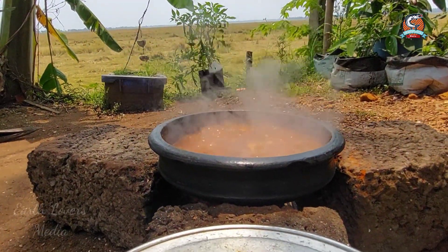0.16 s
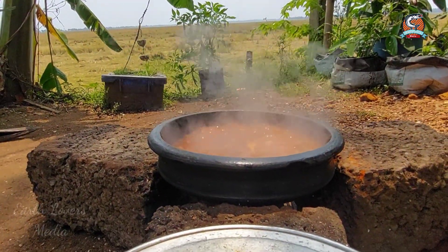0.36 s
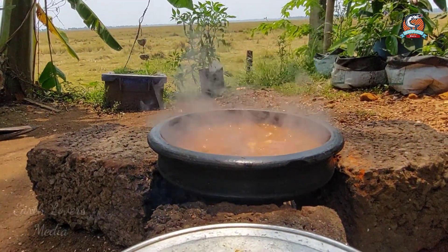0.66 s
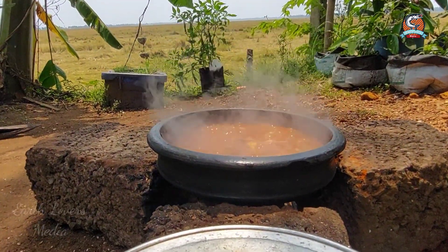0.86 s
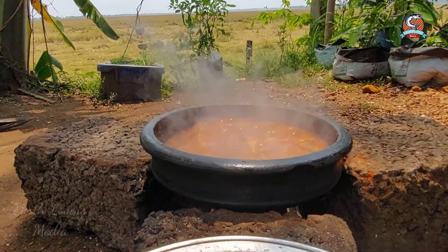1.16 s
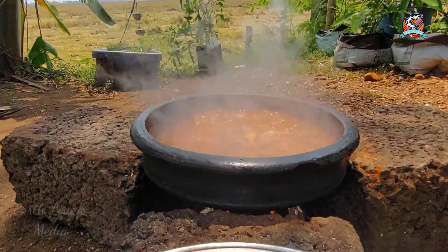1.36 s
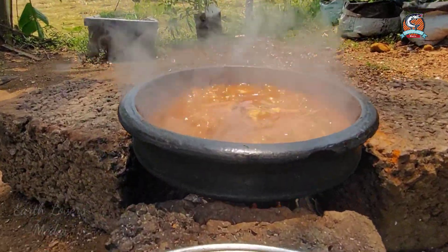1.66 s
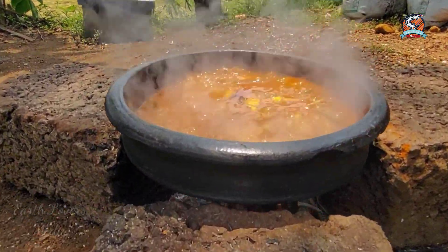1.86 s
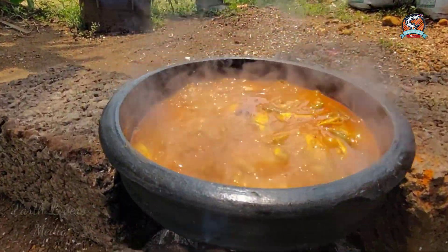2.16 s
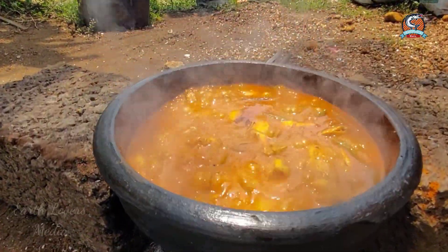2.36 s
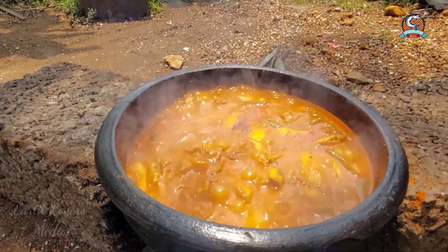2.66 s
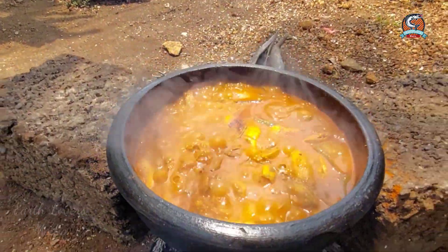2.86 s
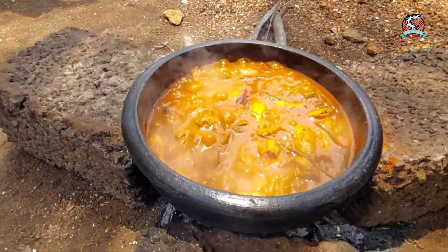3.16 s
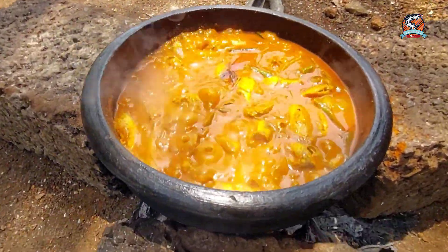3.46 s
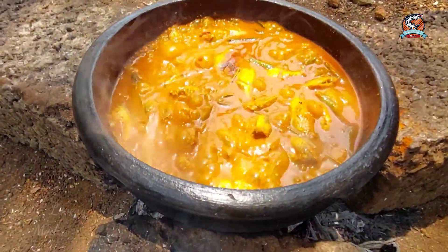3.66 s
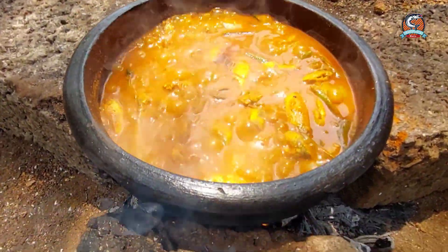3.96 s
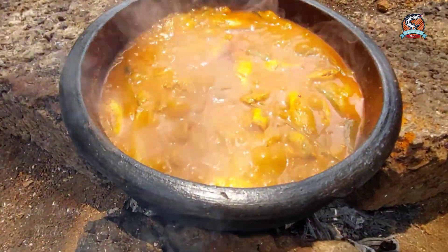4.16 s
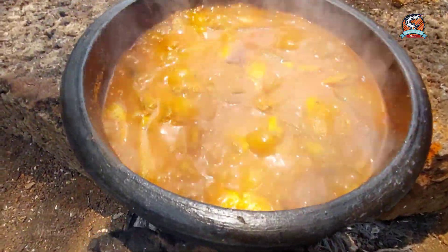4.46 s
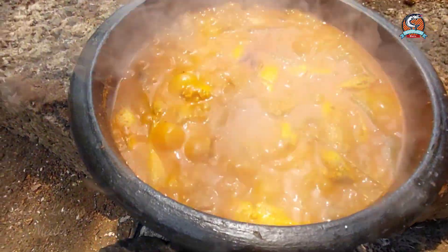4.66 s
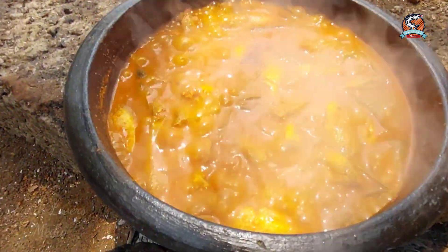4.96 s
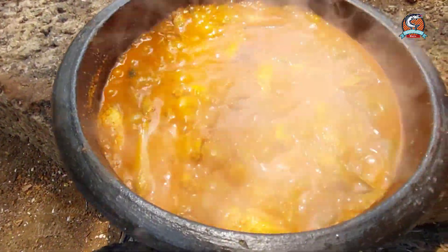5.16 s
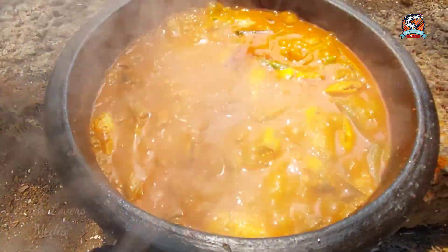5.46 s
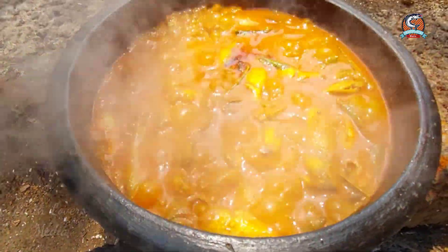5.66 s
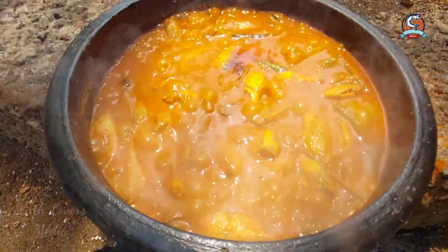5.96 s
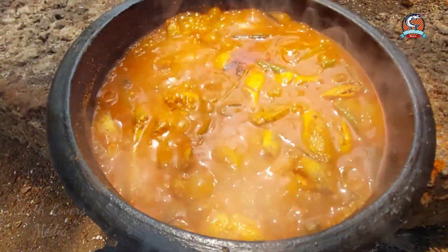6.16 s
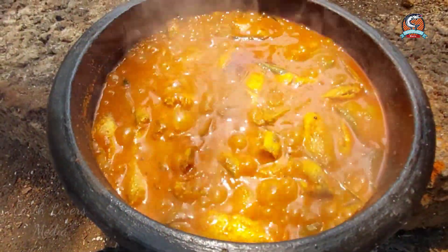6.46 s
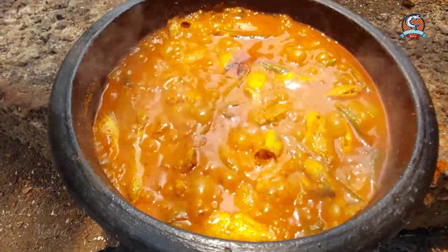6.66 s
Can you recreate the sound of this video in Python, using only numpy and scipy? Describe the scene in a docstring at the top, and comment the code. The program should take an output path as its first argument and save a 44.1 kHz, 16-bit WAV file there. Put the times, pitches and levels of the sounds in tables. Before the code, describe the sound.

A heavy sauce bubbles and spits over an open hearth, starting distant with faint bird notes, then swelling into close, sharp, gloopy popping.

```python
"""Thick curry boiling in a clay pot

The pot boils hard on an outdoor wood hearth while the microphone moves in from a step away to just over the rim.
Bubbles burst in clusters, each a short ring that climbs in pitch; shaped noise churns and fizzes beneath them.
Fine spatter adds brief high rings with spits of noise, and a low draught rumbles as wavering noise.
Puffs of air thump on the microphone as falling low tones, and a far bird calls faintly near the start.
"""
import sys
import numpy as np
from scipy import signal
from scipy.fft import rfft, irfft, next_fast_len
from scipy.io import wavfile
from scipy.ndimage import map_coordinates

SR = 44100
rng = np.random.default_rng(int(sys.argv[2]) if len(sys.argv) > 2 else 0)


def wav_out(sig):
    """Save sig, one row per channel (or a flat mono array), as 16-bit PCM at SR to the path in sys.argv[1]."""
    wavfile.write(sys.argv[1], SR, np.round(np.clip(np.atleast_2d(sig).T, -1, 1) * 32767).astype(np.int16))


N = 299880

# Noise colour of the fizz and of the spits of steam. Each row: frequency in Hz, relative level in dB.
FIZZ_COLOUR = [(1500, 0), (3200, 12.5), (5300, 4), (7500, 1.5), (11200, 3.5), (12200, -10), (15500, -20)]
# The treble that tiny bubbles and spatter radiate. Each row: frequency in Hz, gain in dB.
SPRAY_GAIN = [(1000, -4), (4000, -1), (5300, 0), (8000, -3), (11200, -2), (12200, -6), (15500, -11)]
# Thick sauce softens the onset of its bursts. Each row: frequency in Hz, gain in dB.
SAUCE_GAIN = [(1000, -0.5), (2700, 1), (3600, 4), (5000, -18), (8000, -15), (12000, -21), (15500, -32)]
POP_OVER_DB = 15.5  # typical level of a lesser pop above the boil, in dB


def amp(db):
    """Turn decibels into a gain."""
    return 10 ** (np.asarray(db) / 20)


def unit(x):
    """Scale a sound to an rms (average strength) of 1."""
    return x / np.sqrt(np.mean(x ** 2) + 1e-20)


def curves(rows):
    """Draw straight lines between the rows: one value per sample for each column after the time."""
    s, *columns = np.transpose(rows)
    t = np.arange(N) / SR
    return [np.interp(t, s, column) for column in columns]


def wobble(rate):
    """Make a smooth random curve through `rate` random points a second."""
    points = rng.standard_normal(int(N * rate / SR) + 4)
    return map_coordinates(points, [np.arange(N) * rate / SR])


def filtered(x, response):
    """Multiply the spectrum of x by a gain that depends on frequency."""
    size = next_fast_len(N + SR // 4)
    gain = response(np.fft.rfftfreq(size, 1 / SR))
    return irfft(rfft(x, size) * gain, size)[..., :N]


def coloured(x, spectrum):
    """Filter x through rows of frequency in Hz and gain in dB."""
    hz, db = np.transpose(spectrum)
    return filtered(x, lambda f: amp(np.interp(np.log(f + 1), np.log(hz), db)))


def noise(spectrum):
    """Make coloured noise with an rms of 1."""
    return unit(coloured(rng.standard_normal(N), spectrum))


def placed(starts, waves):
    """Add short sounds into one track, each from its start time in seconds."""
    first = np.round(np.abs(starts) * SR).astype(int)
    index = first[:, None] + np.arange(waves.shape[1])
    return np.bincount(index.ravel(), waves.ravel(), N)[:N]


def rings(starts, db, hz, t60, rise, size):
    """Bursting bubbles: each cavity rings briefly, and its pitch climbs as the hole in the film widens."""
    t = np.arange(size) / SR
    age = t / np.abs(t60)[:, None]  # 1 when the decay has reached 60 dB
    phase, opening = rng.random((len(hz), 2)).T[:, :, None]
    # most holes open slowly in the thick sauce; only a few chirp steeply
    pitch = hz[:, None] * (1 + rise * opening ** 2 * (np.minimum(age, 1) - .2))
    # the ring builds over its first cycle, and the damping grows as the cavity collapses
    build = 1 - np.exp(-2 * t * hz[:, None])
    decay = np.exp(-np.log(1000) * age ** 1.35)
    tone = np.sin(2 * np.pi * (phase + np.cumsum(pitch, 1) / SR))
    return placed(starts, amp(db)[:, None] * build * decay * tone)


def swarm(activity, centre_hz, octaves, cycles, spread_db, rise, count, size):
    """Many small bubbles of scattered size crowd where the activity is high; their sum has an rms of 1."""
    share = np.cumsum(activity) / np.sum(activity)
    starts = np.interp(rng.random(count), share, np.arange(N) / SR)
    # sqrt(6) gives the random draws a spread (standard deviation) of 1
    bore, life, force = np.sqrt(6) * rng.triangular(-1, 0, 1, (3, count))
    hz = centre_hz * 2 ** (octaves * bore)
    t60 = cycles / hz * np.exp(0.3 * life)
    return unit(rings(starts, spread_db * force, hz, t60, rise, size=size))


def scattered(level_db, scatter_db, centre_hz, octaves, count):
    """Bursts at a steady mean rate that follow a level curve: times in s, levels in dB, pitches in Hz."""
    slot, force, bore = rng.triangular(-1, 0, 1, (count, 3)).T
    s = np.clip((np.arange(count) + .5 + slot) / count, 0, 1) * (N - 1) / SR
    db = level_db[(s * SR).astype(int)] + scatter_db * np.sqrt(6) * force
    return s, db, centre_hz * 2 ** (octaves * np.sqrt(6) * bore)


def boil_db():
    """Level of the boil that drives every kind of bubble: a slow curve with heaves on top."""
    # The boil, mostly growing as the pot comes nearer. Each row: time in seconds, level in dB.
    slow_boil = [(0.0, -42.5), (1.02, -43), (1.48, -41), (1.93, -40), (2.9, -38), (4.79, -36), (5.23, -36),
                 (5.43, -38.5), (6.7, -38.5), (6.8, -38)]
    # The sauce heaves and lets out many bubbles at once.
    # Each row: time of the middle in seconds, gain in dB, half length in seconds.
    heaves = [(2.512, 7, .05), (2.819, 3.5, .05), (3.662, 2, 0.066), (4.428, 2, 0.072), (5.109, 5, .07)]
    level, = curves(slow_boil)
    t = np.arange(N) / SR
    return level + sum(db * np.exp(-((t - s) / half) ** 2) for s, db, half in heaves)


def treble_db():
    """Level that drives fizz and ticks: it rises 0.94 dB for each dB of the boil."""
    level = boil_db()
    return level.mean() + 0.94 * (level - level.mean())


def pop_rows():
    """Loud pops with lesser ones between; the faster a lesser bubble empties, the higher its level."""
    # The loud bursting bubbles, before filtering.
    # Each row: start in seconds, level in dB, middle pitch in Hz, time to decay by 60 dB in seconds.
    loud_pops = [(0.1022, -23.5, 1140, 0.017), (0.4577, -13, 1750, 0.003), (0.4685, -15, 1560, 0.0017),
                 (0.6955, -24, 1276, 0.0081), (1.37, -20.5, 878, .012), (1.4613, -18.5, 1075, 0.0062),
                 (1.5, -20.5, 1498, .01), (1.6016, -23.5, 1207, 0.018), (1.6259, -14, 1465, 0.005),
                 (1.8985, -24.5, 1207, 0.022), (2.1495, -16, 1380, 0.0073), (2.1967, -16, 1598, 0.0059),
                 (2.2734, -15.5, 1485, 0.0032), (2.4657, -16.5, 1120, 0.0065), (2.5065, -17, 1300, 0.012),
                 (2.5265, -11.5, 1847, 0.0033), (2.6237, -7.5, 1837, 0.0016), (2.7315, -19, 1160, 0.0094),
                 (2.84, -8, 1637, .0023), (2.8847, -16, 2176, 0.0077), (2.9248, -18.5, 1195, 0.013),
                 (3.02, -22, 1544, 0.01), (3.223, -10, 1433, .004), (3.2343, -9.5, 1382, 0.0031),
                 (3.2677, -13.5, 3250, 0.002), (3.4497, -11.5, 1158, 0.0038), (3.6217, -10, 1170, 0.0019),
                 (3.7211, -14.5, 1924, 0.0063), (3.7686, -18, 2100, .005), (3.97, -19.5, 1396, 0.0056),
                 (3.9939, -13, 1538, 0.0078), (4.0494, -16, 900, 0.0068), (4.0782, -15.5, 2020, 0.0038),
                 (4.095, -14, 1255, 0.0076), (4.162, -18, 1932, .007), (4.1904, -19, 1370, 0.0084),
                 (4.3214, -13, 1726, 0.0055), (4.3726, -18, 1510, 0.014), (4.4657, -10.5, 1850, 0.0031),
                 (4.5272, -20, 2570, 0.0047), (4.5762, -19, 1020, 0.013), (4.586, -14, 1151, 0.0084),
                 (4.6892, -10.5, 1640, 0.0026), (4.789, -9, 1585, 0.02), (4.9088, -13, 2450, 0.0055),
                 (5.0466, -16, 1651, 0.01), (5.2133, -15.5, 813, 0.011), (5.2397, -11.5, 1280, 0.011),
                 (5.391, -18.5, 1902, 0.012), (5.6557, -15, 1382, 0.0063), (5.7664, -13.5, 1050, 0.0067),
                 (6.1671, -13.5, 1715, .0033), (6.1904, -12.5, 2950, 0.0017), (6.2787, -15.5, 1962, 0.0031),
                 (6.3527, -15, 2080, 0.004), (6.392, -18, 1055, 0.018), (6.424, -15.5, 985, 0.0053),
                 (6.491, -21.5, 1770, 0.012), (6.7701, -14, 1200, 0.01)]
    drain_s, drain_db = .03, -8.0  # a loud pop drains the steam from lesser ones this close to it
    loud = np.transpose(loud_pops)
    s, db, hz = scattered(boil_db() + POP_OVER_DB, scatter_db=1.65, centre_hz=1325, octaves=0.435, count=125)
    haste = rng.uniform(-0.9, 1, len(s))  # how many times the ring is halved in length
    gap = np.abs(s[:, None] - loud[0]).min(axis=1)
    db = db + 2.0 * haste + drain_db * np.exp(-(gap / drain_s) ** 2)
    t60 = 12.9 / hz / 2 ** haste  # 12.9 cycles of ring, before haste
    return np.hstack([loud, [s, db, hz, t60]])


def crowding(rows):
    """How closely small bubbles crowd around the pops: 0 far from them, towards 1 close to a strong one."""
    s, db = rows[:2]
    over = amp(db - boil_db()[(s * SR).astype(int)] - POP_OVER_DB)
    t = np.arange(-SR // 16, SR // 16) / SR
    crowd_shape = np.exp(-(t / .018) ** 2)  # falls away over about 18 ms on each side
    near = signal.fftconvolve(placed(s, over[:, None]), crowd_shape, "same")
    return np.tanh(near / 2)


def simmer(rows):
    """The surface seethes in clusters: deep blips, small and tiny bubbles, fizz, and a soft churn beneath."""
    # Noise colour of the churning sauce. Each row: frequency in Hz, relative level in dB.
    churn_colour = [(120, 5), (220, -7), (340, 2.5), (480, -2), (700, 2), (1400, -8.5), (2300, -9.5),
                    (3200, -17.5), (4500, -37), (8000, -52), (16000, -90)]
    crowd = crowding(rows)
    surge_db = 3.5 * (crowd - crowd.mean()) + 1.2 * wobble(16) + 2.8 * wobble(70)
    activity = amp(1.1 * surge_db)
    blips = swarm(activity, centre_hz=721, octaves=0.21, cycles=3.0, spread_db=2.0, rise=0.44, count=680, size=1100)
    small = swarm(activity, centre_hz=1508, octaves=0.496, cycles=13.0, spread_db=5.5, rise=0.99,
                  count=1800, size=800)
    churn = noise(churn_colour) * amp(surge_db)
    mix = amp(-7.0) * blips + amp(-2.5) * small + amp(-5.0) * churn
    body = amp(boil_db() + 0.38) * mix
    tiny = swarm(activity, centre_hz=4680, octaves=0.58, cycles=14.6, spread_db=5.5, rise=0.78,
                 count=2800, size=300)
    fizz = noise(FIZZ_COLOUR) * amp(0.77 * surge_db + 4.1 * wobble(400))
    bright = amp(3.5) * coloured(tiny, SPRAY_GAIN) + amp(-5.0) * fizz
    return coloured(body, SAUCE_GAIN) + amp(treble_db() - 17) * bright


def air():
    """A low draught, and eddies that hit the microphone as short thumps falling in pitch."""
    # Puffs of air on the microphone. Each row: start in seconds, level in dB,
    # pitch in Hz (it falls from 1.15 towards 0.15 times this), time scale in seconds.
    puffs = [(1.149, -28, 247, 0.011), (1.815, -29, 249, 0.028), (2.158, -24.5, 260.2, 0.019),
             (2.239, -24, 220, .014), (2.881, -15.5, 255, 0.022), (2.978, -24.5, 203, 0.021),
             (3.018, -25, 245, 0.023), (3.25, -22, 173.7, 0.026), (3.305, -27, 207.3, 0.033),
             (3.549, -24, 196, 0.032), (4.57, -19, 245.6, .018), (5.191, -17, 173.3, 0.022),
             (5.249, -16, 223, 0.015), (5.468, -20, 250, .016), (5.533, -12, 251, 0.018),
             (5.735, -13.5, 141, 0.035), (5.819, -21.5, 161, 0.026)]
    # Strength of the draught before its wavering. Each row: time in seconds, relative level in dB.
    draught_levels = [(0.0, -51.5), (0.36, -51), (0.74, -56), (1.21, -46), (2.29, -47), (3.35, -43),
                      (4.85, -50), (5.38, -40), (5.68, -41), (5.96, -52), (6.63, -53), (6.8, -50)]
    # Noise colours of the draught and of the eddies. Each row: frequency in Hz, relative level in dB.
    rumble_colour = [(18, -46), (32, -10), (48, 3.5), (62, -1.5), (85, -7), (160, -10), (330, -14.5),
                     (700, -43), (3000, -100)]
    eddy_colour = [(30, -2), (100, -10), (180, 5), (330, -12), (700, -23), (2000, -50), (6000, -100)]
    s, db, hz, length = np.transpose(puffs)
    age = np.arange(SR // 8) / SR / length[:, None]
    pitch = hz[:, None] * (.15 + np.exp(-age / .4))
    rise = age / 0.33  # 1 at the peak of the thump
    swell = amp(db)[:, None] * (rise * np.exp(1 - rise)) ** 1.04
    thumps = placed(s, swell * np.sin(2 * np.pi * np.cumsum(pitch, 1) / SR))
    turbulence = amp(-13) * placed(s, swell) * noise(eddy_colour)
    # each eddy leaves a short wake of rumble in the draught
    wake = placed(s, amp(db - 19.0)[:, None] * age * np.exp(1 - age ** 2))
    draught_db, = curves(draught_levels)
    draught = amp(draught_db + 3.0 + 1.16 * wobble(8.4))
    return amp(1) * thumps + turbulence + (wake + draught) * noise(rumble_colour)


def pops(rows):
    """Big bubbles: the film sputters and tears with a wet smack, the cavity rings, and small neighbours burst."""
    # Wet smack of a tearing film. Each row: frequency in Hz, relative level in dB.
    smack_colour = [(150, 3), (500, 6.5), (1000, 4.5), (2400, 4.5), (3200, 1.5), (4200, -29), (8000, -14),
                    (15000, -26)]
    neighbour_db, tear_db = -11, -18.5  # against the pop they belong to
    s, db, hz, t60 = rows
    cavity = rings(s, db + 0.5, hz, t60, rise=1.0, size=1100)
    parent = np.repeat(np.arange(len(s)), 2)  # two neighbours for each pop
    lag, ratio = rng.standard_normal((len(parent), 2)).T
    starts = s[parent] + .002 + .004 * lag
    neighbour_hz = hz[parent] * 2 ** (.1 + .38 * ratio)
    neighbours = rings(starts, db[parent] + neighbour_db, neighbour_hz, t60[parent] * .9, rise=.5, size=800)
    t = np.arange(-SR // 100, SR // 40) / SR
    # the tear grows by 60 dB in 5 ms, then fades by 60 dB in 14 ms
    fade = np.where(t < 0, -t / .005, t / .014)
    tear = placed(s + t[0] + .0005, amp(db[:, None] + tear_db - 60 * fade))
    return coloured(cavity + neighbours, SAUCE_GAIN) + tear * noise(smack_colour)


def pot():
    """All the bubbling; the rim shades its upper ring until the microphone looks over it."""
    # The upper ring of the bubbles. Each row: frequency in Hz, gain in dB.
    upper_ring = [(1500, -52), (2300, -3), (3400, 1.5), (4200, 0.5), (5500, -11), (8000, -35)]
    over_rim_s, over_rim_takes_s = 2.2, 0.8  # middle and time scale of the move over the rim
    shaded_db, open_db = -4.0, 0.5
    rows = pop_rows()
    bubbling = pops(rows) + simmer(rows)
    in_view = (1 + np.tanh((np.arange(N) / SR - over_rim_s) / over_rim_takes_s)) / 2
    ring_gain = amp(shaded_db + (open_db - shaded_db) * in_view)
    # the ring is already in the bubbling, so only the change is added
    return bubbling + (ring_gain - 1) * coloured(bubbling, upper_ring)


def bird():
    """Thin, hoarse notes from across the field: arching tones with flutter in pitch and loudness."""
    # Far bird notes. Each row: start in seconds, level in dB, base pitch in Hz before arch and flutter.
    bird_notes = [(.05, -59, 2950), (.73, -50, 3150), (1.014, -52, 3143), (1.319, -52, 3120),
                  (1.61, -53, 3080)]
    s, db, hz = np.transpose(bird_notes)
    note_s = 0.08
    arch = np.sin(np.pi * np.minimum(np.arange(SR // 5) / SR / note_s, 1))
    flutter = wobble(200)[:len(s) * len(arch)].reshape(len(s), -1)  # a different piece for each note
    pitch = hz[:, None] * (.975 + 0.0302 * arch + 0.024 * flutter)
    tone = np.sin(2 * np.pi * np.cumsum(pitch, 1) / SR)
    notes = placed(s, amp(db)[:, None] * arch * tone)
    return notes * (1 + 0.65 * wobble(120))


def spatter():
    """Bright ticks that ring for only a few cycles, each with a short spit of steam."""
    # The sharp ticks. Each row: start in seconds, level in dB before later gains, middle pitch in Hz.
    sharp_ticks = [(1.383, -37, 8750), (1.5459, -37, 4430), (1.97, -36, 9480), (2.2736, -37, 6800),
                   (2.623, -33, 4900), (2.8755, -36, 8190), (3.8584, -35, 5390), (3.8952, -39, 6300),
                   (4.034, -33, 10430), (4.379, -34, 8680), (4.4503, -32, 5520), (4.5024, -33.5, 11000),
                   (4.677, -33, 8495), (5.3353, -36, 6340), (5.737, -34.5, 7200), (5.7768, -32.5, 7500),
                   (6.1916, -28.5, 4500), (6.2093, -31.5, 6560)]
    lesser = scattered(treble_db() - 6.5, scatter_db=2.6, centre_hz=7820, octaves=0.36, count=70)
    s, db, hz = np.hstack([np.transpose(sharp_ticks), lesser])
    ticks = rings(s, db + 11.5, hz, 14 / hz, rise=0.58, size=250)
    t = np.arange(SR // 30) / SR
    spit_db = db[:, None] - 3.0 - 60 * t / 0.017  # fades by 60 dB in 17 ms
    spit = placed(s, amp(spit_db)) * noise(FIZZ_COLOUR)
    return coloured(ticks, SPRAY_GAIN) + spit


def scene():
    """Open air, so no room: the sources are centred, and the sides differ in faint hiss and top treble."""
    # Noise colour of the microphone hiss. Each row: frequency in Hz, relative level in dB.
    hiss_colour = [(1000, 12.5), (4000, 2.5), (5300, 0.5), (7800, -4), (8500, 5.5), (9050, 12), (9800, 3),
                   (11400, -8), (12000, -6), (14500, -8.5), (15600, -27)]
    mid = pot() + spatter() + air() + bird() + amp(-55.0) * noise(hiss_colour)
    side = amp(-74) * noise([(3000, -33), (5000, -15.0), (10500, -6), (11800, 5), (15000, -2)])
    # the treble above about 11.8 kHz leans to the left
    lean = filtered(mid, lambda f: 0.29 / (1 + (11800 / (f + 1)) ** 20))
    return np.array([mid + side + lean, mid - side - lean])


def record(dry):
    """The microphone rolls off the deepest bass and keeps nothing from its band limit upward."""
    top_hz, bass_hz = 15600, 30
    return filtered(dry, lambda f: (f < top_hz) * f ** 2 / np.sqrt(f ** 4 + bass_hz ** 4))


dry = scene()
out = record(dry)
wav_out(out)
```